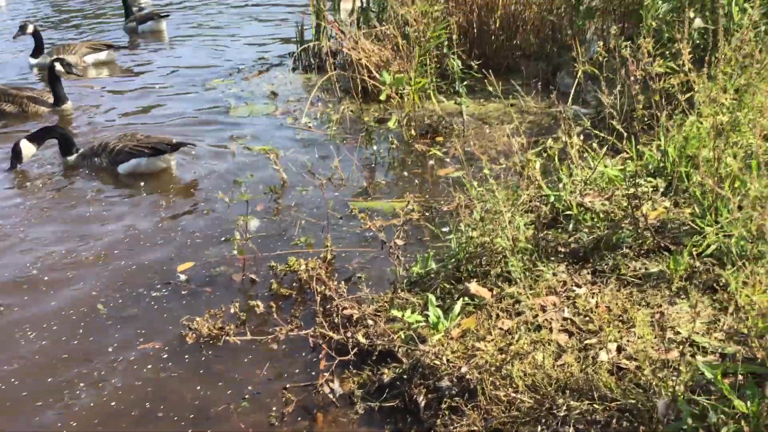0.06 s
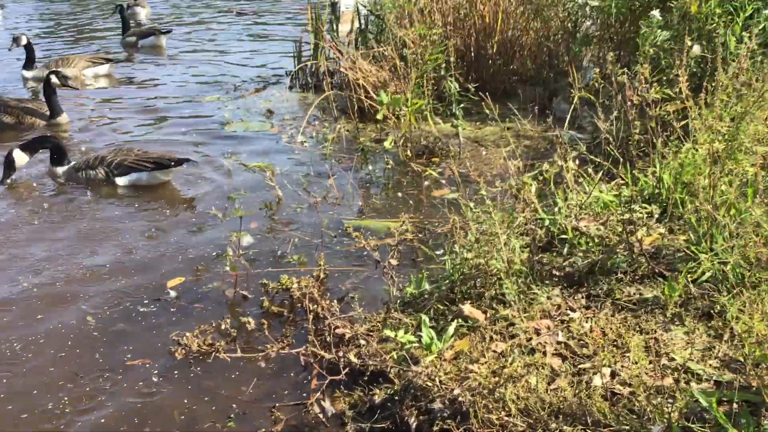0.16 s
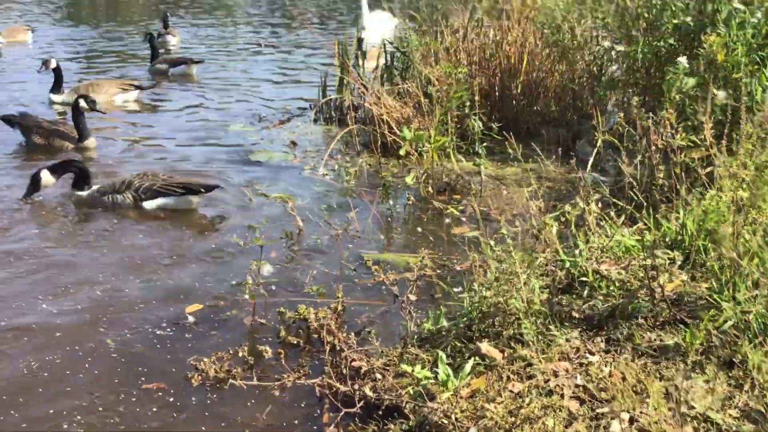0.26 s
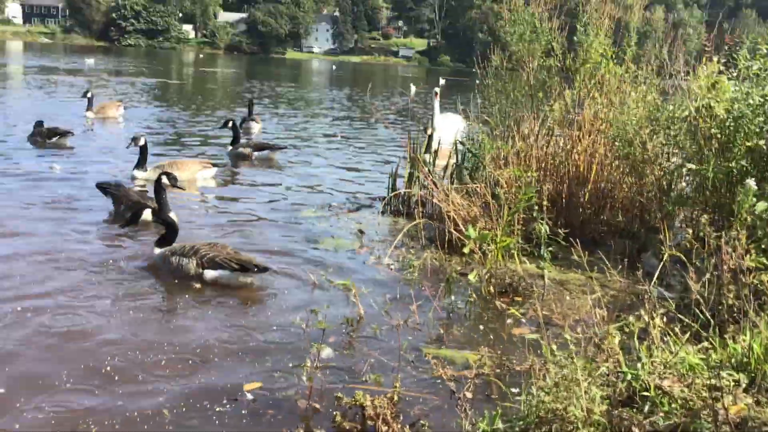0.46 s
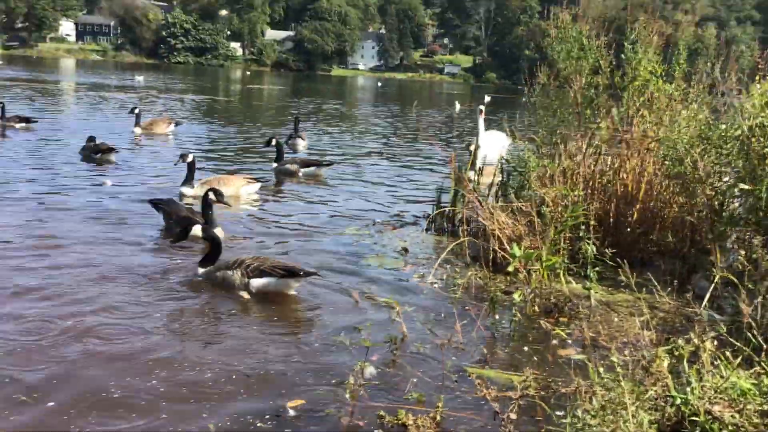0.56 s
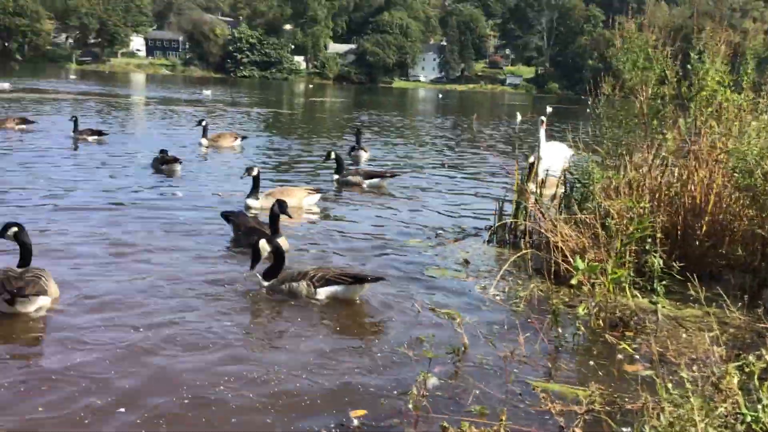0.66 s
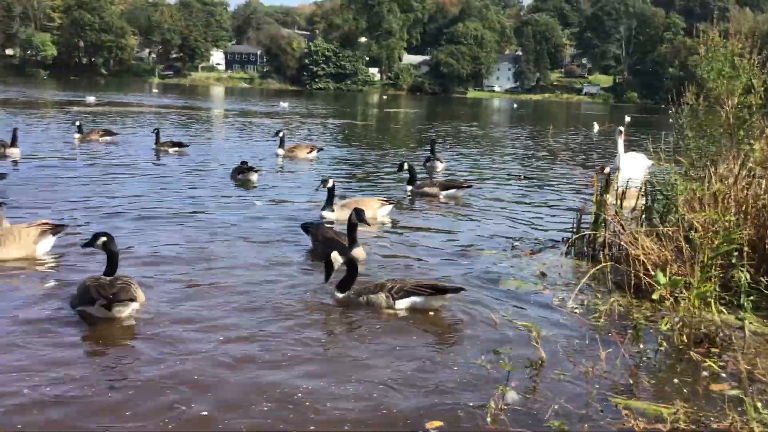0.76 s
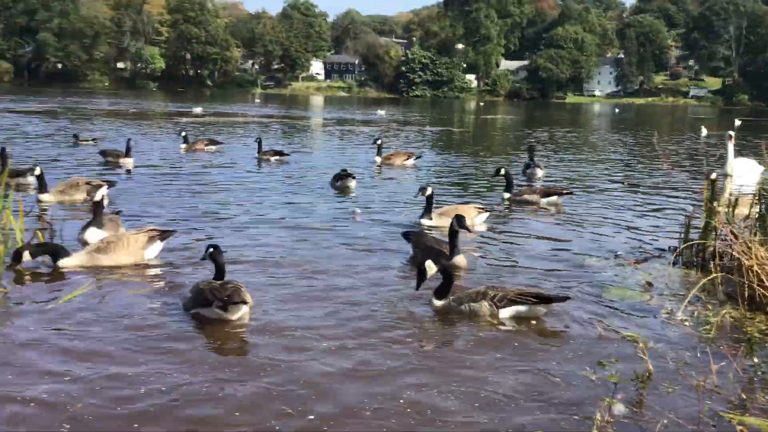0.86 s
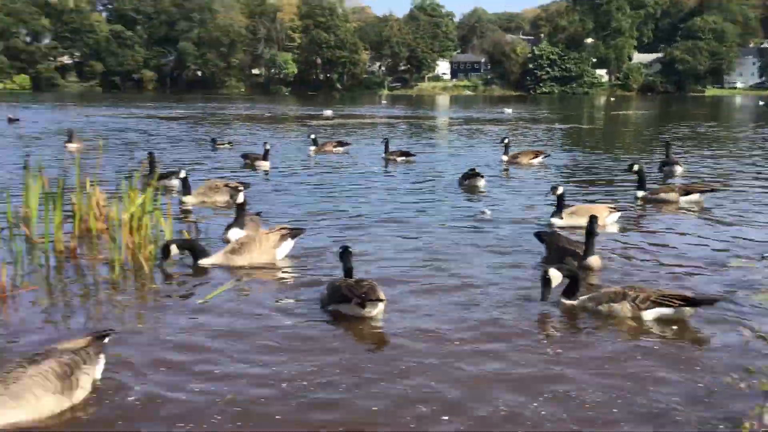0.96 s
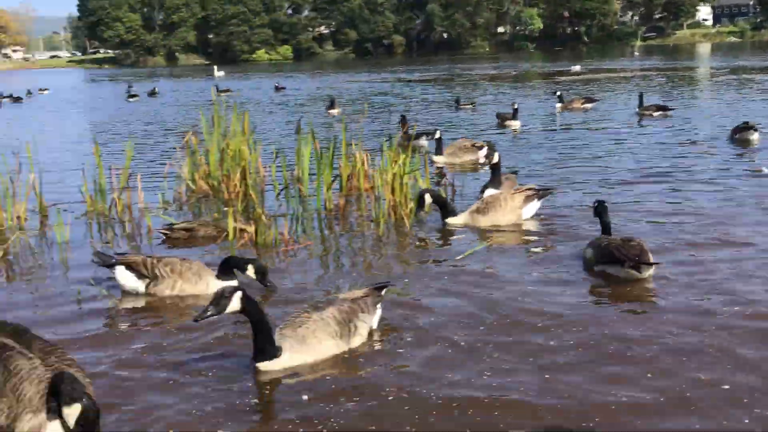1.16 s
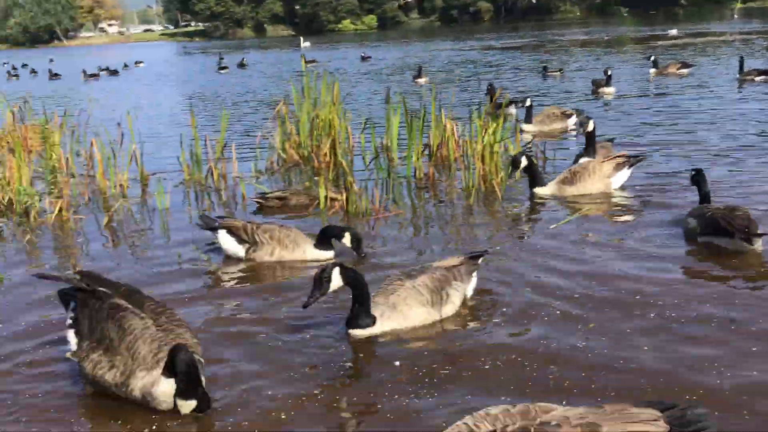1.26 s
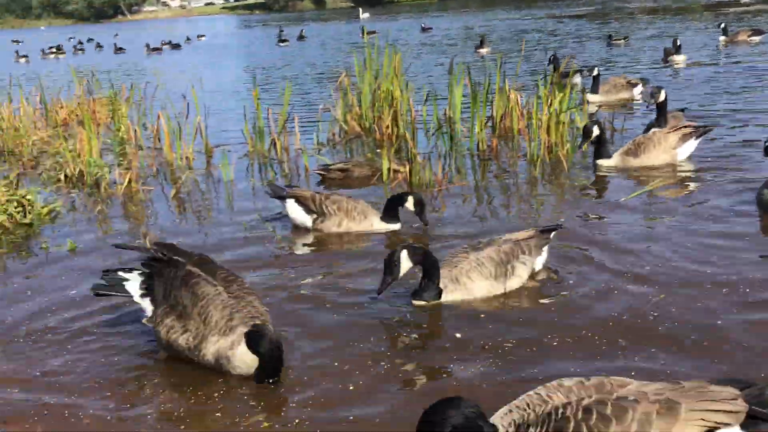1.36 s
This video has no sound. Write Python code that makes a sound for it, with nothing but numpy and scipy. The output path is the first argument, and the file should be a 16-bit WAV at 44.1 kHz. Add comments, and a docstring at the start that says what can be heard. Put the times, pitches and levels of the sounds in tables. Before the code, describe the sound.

A goose honks once, close by, from about 0.2 to 0.4 seconds, a low grunt breaking into a loud, brassy note. A soft splash and drips come just before it. Faint paddling splashes follow, with a small bubble near 0.7 seconds and more splashes around 1.3. Thin, high insect buzzing eases after 1 second, and a quiet distant rumble runs throughout, with a slight low bump near 1.1.

```python
"""At a reedy lake shore a goose honks once, close by: a low grunt cracks into a bright, brassy note.
Both registers are pulse trains shaped by the resonances of the throat. Swimming geese make small
splashes, drips and a ringing bubble, and the bank and the water reflect these sounds and the call.
Two katydids buzz in the grass by scraping their wings. A far-off rumble, with one brief low bump
in it, lies under it all."""
import sys
import numpy as np
from scipy import signal
from scipy.fft import rfft, irfft
from scipy.io import wavfile

SR = 44100
rng = np.random.default_rng(int(sys.argv[2]) if len(sys.argv) > 2 else 0)


def master(y):
    """Save y as 16-bit WAV."""
    cut = np.clip(np.atleast_2d(y).T, -1, 1)
    pcm = np.round(cut * 32767)  # scale
    wavfile.write(sys.argv[1], SR, pcm.astype(np.int16))


N = 61739
T = np.arange(N) / SR

# Fundamental of the voice, shared by both registers (time [s], frequency [Hz])
VOICE_PITCH = [(.23, 550.3), (.268, 557.2), (.287, 567), (.3, 527.4), (.313, 500.6), (.36, 506.3),
               (.373, 511.2), (.382, 536), (.4, 517)]
# Envelope of the low register (time [s], level [dB])
GRUNT_LEVEL = [(.222, -51), (.235, -39), (.246, -22), (.292, -23.5), (.304, -18), (.314, -28), (.325, -66),
               (.39, -47)]
# Envelope of the rasp, strongest where the voice breaks (time [s], level [dB])
RASP_LEVEL = [(.232, -62), (.246, -38.5), (.288, -45), (.298, -29), (.316, -22), (.33, -47), (.37, -51),
              (.4, -68)]
# Envelope and brightness of the high register (time [s], level [dB], source tilt [dB/octave])
HONK_ENVELOPE = [(.29, -78.5, -18), (.304, -23, -18), (.316, -18.5, -2), (.335, -18.5, 2), (.362, -19, 3.3),
                 (.374, -21, 1.7), (.384, -18.5, -1.5), (.393, -23.5, -9), (.406, -45, -38)]
# Throat response for the grunt, the rasp and the honk (frequency [Hz], relative gain [dB])
GRUNT_THROAT = [(90, -62), (185, -4), (370, -17), (555, 2.5), (740, 2), (925, -23), (1110, -7),
                (1300, -1.5), (1650, -33), (2200, -16.5), (3100, -27), (5800, -28), (10000, -80)]
RASP_THROAT = [(80, -45), (900, -24.5), (1250, 5), (1550, -6), (2900, 0.5), (3600, -15), (4600, 1.5),
               (5400, -3.5), (6100, -13), (7300, -14.5), (9500, -27.5), (16000, -31)]
HONK_THROAT = [(250, -9.5), (505, 3), (1000, -8.5), (1270, 5.5), (1520, -5), (2020, 2.5), (2530, -6),
               (3030, -29), (3540, -9.5), (4500, -7.5), (6500, -13.5), (7600, -23), (8600, -19.5),
               (10500, -34), (16000, -59)]
# Gape of the bill (time [s], opening [0-1])
BILL_OPENING = [(.32, 0), (.34, 0.27), (.365, 0.85), (.39, 0.9)]
# Two resonances and a notch of the bill (shut centre [Hz], open centre [Hz], half-width [Hz], gain [dB])
BILL_MODES = [(4330, 3690, 730, 7), (4870, 5670, 180, 10.5), (8100, 7040, 400, -30)]
# Splashes from paddling (peak time [s], half-length [s], level [dB], cutoff [Hz])
SPLASHES = [(0.125, 0.093, -44.5, 9150), (0.681, 0.036, -53.5, 3670), (.831, 0.017, -49.5, 3330),
            (1.245, 0.018, -53, 3650), (1.3459, 0.003, -42.5, 3370), (1.39, .07, -55, 3130)]
# Spectrum of the droplet spray (frequency [Hz], relative level [dB])
SPRAY_SPECTRUM = [(300, -4), (1500, -3.5), (5000, 0), (7500, -7), (16000, 8)]
# Drips and small bubbles (time [s], starting pitch [Hz], level [dB], time to fall 20 dB [s])
DRIPS = [(0.0227, 5000, -23.5, 0.0011), (0.095, 5970, -34, 0.0017), (0.1022, 1493, -35, 0.012),
         (.108, 4400, -31, 0.0066), (0.194, 5400, -33.5, 0.0046), (0.218, 1600, -41, 0.0091),
         (0.584, 1552, -42.5, 0.01), (0.6945, 2590, -40.5, 0.0094), (0.7206, 1480, -34.5, 0.0032),
         (1.0669, 3710, -31, 0.0029), (1.087, 3800, -36.5, 0.0022)]
# One large bubble (time [s], length [s], first pitch [Hz], last pitch [Hz], level [dB])
LARGE_BUBBLE = (.698, .044, 470, 730, -45.5)
# Reflection off the water and the bank (frequency [Hz], gain [dB])
SHORE_RESPONSE = [(200, -24.5), (520, -12.5), (880, -11.5), (1060, 4.5), (1350, -24), (4000, -20),
                  (9000, -16)]
# Distinct returns from the shore (delay [s], gain on top of the shore response [dB])
ECHOES = [(0.027, -10.5), (.068, -20), (.156, -28.5)]
# Katydids (start [s], end [s], time of one stroke [s], stroke rate [Hz], level then [dB], fade [dB/s])
KATYDIDS = [(-.1, 1.0, .499, 50.05, -41, 2), (-.1, 1.5, 1.213, 47, -50.5, -6)]
# Song spectrum of each katydid (frequency [Hz], relative level [dB])
SONG_SPECTRA = [
    [(5000, -26.5), (8000, -36), (9500, -15.5), (12000, -12.5), (12800, -3), (13700, -4.5), (14500, 3.5),
     (15500, -3.5)],
    [(5000, -15), (6400, -5.5), (7200, -29), (11000, -9.5), (13400, 2.5), (15500, -2)],
]
# Envelope of the low bump in the rumble (time [s], level [dB])
BUMP_LEVEL = [(1.1, -82), (1.13, -43), (1.17, -59), (1.4, -76)]
# Spectrum of the low bump (frequency [Hz], relative level [dB])
BUMP_SPECTRUM = [(25, -37), (95, 30), (300, -35)]
# Spectrum of the far rumble and the wash of the lake (frequency [Hz], relative level [dB])
RUMBLE_SPECTRUM = [(25, -64), (95, -19), (135, -0.5), (185, -0.5), (310, -8), (430, -16.5), (800, -21.5),
                   (1400, -20), (4000, -31), (5000, -44.5), (16000, -34)]


def goose(grunt_jitter=.008, honk_jitter=.0024, cycles_per_grunt_pulse=3):
    """Register break: one oscillation sounds first at its third subharmonic, then at its fundamental."""
    hz = curve(VOICE_PITCH)
    grunt_gain, honk_gain = amp(curve(GRUNT_LEVEL)), amp(curve(HONK_ENVELOPE))
    grunt_share = grunt_gain / (grunt_gain + honk_gain)
    jitter = (grunt_share * grunt_jitter + (1 - grunt_share) * honk_jitter) * wander(hz=242)
    cycles = np.cumsum(hz * (1 + jitter)) / SR
    return grunt(cycles / cycles_per_grunt_pulse) - honk(cycles, hz)


def grunt(cycles, puff_cycles=.45, puff_floor=.35, snap_db=-10, shimmer_db=2.5):
    """Source and filter: slow pulses excite a nearly closed throat, each with a snap and a puff of rasp."""
    pulses = unit(sum(np.cos(2 * np.pi * k * cycles) for k in range(1, 60)))
    puffs = unit((puff_floor + np.exp(-(cycles % 1) / puff_cycles)) * rng.standard_normal(N))
    shimmer = amp(shimmer_db * wander(hz=110))
    rasp = colour((puffs + amp(snap_db) * pulses) * shimmer, RASP_THROAT)
    return level(GRUNT_LEVEL) * unit(colour(pulses, GRUNT_THROAT)) + level(RASP_LEVEL) * unit(rasp)


def honk(cycles, hz, knee_hz=2000, smear_s_per_hz=2e-7, strain_at_s=.369, strain_width_s=.01):
    """Formant filtering: harmonics brighten with effort and pass the throat and the opening bill."""
    tilt, opening = curve(HONK_ENVELOPE, column=2), curve(BILL_OPENING)
    # Period doubling: under strain the pulses alternate strong and weak, early and late.
    alternation = np.exp(-((T - strain_at_s) / strain_width_s) ** 2) * np.cos(np.pi * cycles)
    strained_cycles = cycles + .0068 * alternation
    pulses = np.zeros(N)
    for k in range(1, 28):
        harmonic_hz = k * hz
        db = tilt * np.log2(np.hypot(1, harmonic_hz / knee_hz))
        for shut_hz, open_hz, width_hz, mode_db in BILL_MODES:
            centre_hz = shut_hz + opening * (open_hz - shut_hz)
            db += mode_db * np.exp(-((harmonic_hz - centre_hz) / width_hz) ** 2)
        # Dispersion: the long windpipe delays the treble.
        phase_lag = np.pi * smear_s_per_hz * harmonic_hz ** 2
        pulses += amp(db) * np.cos(2 * np.pi * k * strained_cycles - phase_lag)
    voice = colour(pulses * (1 + .14 * alternation), HONK_THROAT)
    gain = level(HONK_ENVELOPE)
    return gain * voice / np.sqrt(np.average(voice ** 2, weights=gain ** 2))


def splashes(drops_per_s=4000, spread_db=4):
    """Shot noise: clouds of random droplet impacts swell and fade as the geese paddle."""
    impacts = (rng.random(N) < drops_per_s / SR) * rng.choice([-1, 1], N)
    strengths = amp(spread_db * np.minimum(rng.exponential(1, N), 4))
    spray = colour(impacts * strengths, SPRAY_SPECTRUM)
    out = np.zeros(N)
    for peak_s, width_s, db, cutoff_hz in SPLASHES:
        soft_spray = signal.sosfilt(signal.butter(4, cutoff_hz, fs=SR, output="sos"), spray)
        out += amp(db) * np.exp(-((T - peak_s) / width_s) ** 2) * unit(soft_spray)
    return out


def drips(attack_s=.00013, rise_per_ring=.166):
    """Damped oscillation: each drip or small bubble rings as a decaying sine of rising pitch."""
    out = np.zeros(N)
    for start, hz, db, ring_s in DRIPS:
        age = np.maximum(T - start, 0)
        envelope = amp(db - 20 * age / ring_s) * (1 - np.exp(-age / attack_s))
        out += envelope * np.sin(2 * np.pi * hz * age * (1 + rise_per_ring * age / ring_s / 2))
    return out


def large_bubble():
    """Bubble resonance: the pitch glides upward as the bubble nears the surface."""
    start, length, first_hz, last_hz, db = LARGE_BUBBLE
    progress = np.clip((T - start) / length, 0, 1)
    hz = first_hz + progress * (last_hz - first_hz)
    return amp(db) * np.sin(np.pi * progress) * np.sin(2 * np.pi * np.cumsum(hz) / SR)


def shore(x, onset_s=.0019, bank_db=-21, bank_t60_s=.079, lake_db=-41, lake_t60_s=.25):
    """Reflection: quick scatter from the near bank, a faint tail across the water and three echoes."""
    bank = amp(bank_db - 60 * T / bank_t60_s) / np.sqrt(bank_t60_s)
    lake = amp(lake_db - 60 * T / lake_t60_s) / np.sqrt(lake_t60_s)
    energy_scale = np.sqrt(2 * np.log(1000) / SR)  # a decay at 0 dB would carry unit energy
    tail = noise(SHORE_RESPONSE) * (bank + lake) * (T > onset_s) * energy_scale
    reflected = colour(x, SHORE_RESPONSE)
    echoes = sum(amp(db) * np.interp(T - delay, T, reflected, left=0) for delay, db in ECHOES)
    return signal.fftconvolve(x, tail)[:N] + echoes


def katydids(stroke_db=8, sharpness=1.3, tooth_db=1.1):
    """Stridulation: each wing stroke scrapes a short burst of very high hiss."""
    out = np.zeros(N)
    for (start, end, stroke_s, stroke_hz, db, fade), spectrum in zip(KATYDIDS, SONG_SPECTRA):
        strokes = np.tanh(sharpness * np.cos(2 * np.pi * stroke_hz * (T - stroke_s)))
        scrape = amp(stroke_db * strokes + tooth_db * wander(hz=600)) * rng.standard_normal(N)
        envelope = amp(db - fade * (T - stroke_s)) * (T > start) * (T < end)
        out += envelope * unit(colour(scrape, spectrum))
    return out


def low_bump():
    """Amplitude envelope: a band of low noise swells briefly, heard as a bump in the background rumble."""
    return level(BUMP_LEVEL) * noise(BUMP_SPECTRUM)


def rumble(db=-43, waver_db=.84):
    """Ambient noise: far rumble and lake wash merge in one spectrum whose level wavers a little."""
    return amp(db + waver_db * wander(hz=6)) * noise(RUMBLE_SPECTRUM)


def amp(db):
    """Decibel law: level to amplitude ratio."""
    return 10 ** (np.asarray(db) / 20)


def unit(x):
    """Normalisation to rms 1."""
    return x / np.sqrt(np.mean(x ** 2) + 1e-20)


def curve(rows, column=1):
    """Linear interpolation of one column of a time table, at every sample."""
    rows = np.array(rows)
    return np.interp(T, rows[:, 0], rows[:, column])


def level(rows):
    """Amplitude envelope from a level table, silent outside its span."""
    return amp(curve(rows)) * (T >= rows[0][0]) * (T <= rows[-1][0])


def colour(x, response, size=4096):
    """Minimum-phase filtering by a response given as (frequency [Hz], gain [dB])."""
    hz, db = np.transpose(response)
    bin_hz = abs(np.fft.fftfreq(size, 1 / SR))
    log_gain = np.log(amp(np.interp(np.log(bin_hz + 1), np.log(hz), db)))
    impulse_response = np.fft.ifft(np.exp(np.conj(signal.hilbert(log_gain)))).real
    return signal.fftconvolve(x, impulse_response[:size // 2])[:len(x)]


def noise(spectrum):
    """Spectral shaping of white noise, at rms 1."""
    return unit(colour(rng.standard_normal(N), spectrum))


def wander(hz):
    """Random modulation: low-pass noise of rms 1, up to about the given rate."""
    low_pass = np.exp(-(np.fft.rfftfreq(N, 1 / SR) / hz) ** 2)
    return unit(irfft(rfft(rng.standard_normal(N)) * low_pass, N))


def scene():
    """Superposition: goose and water with their reflections, then insects and rumble, in mono."""
    near = goose() + splashes() + drips() + large_bubble()
    return (near + shore(near) + katydids() + rumble() + low_bump())[None]


def record(dry, cutoff_hz=15850):
    """Band limiting: a linear-phase low-pass filter removes the highest treble."""
    low_pass = signal.firwin(511, cutoff_hz, window=("kaiser", 9), fs=SR)
    return signal.oaconvolve(dry, low_pass[None], "same")


dry = scene()
out = record(dry)
master(out)
```